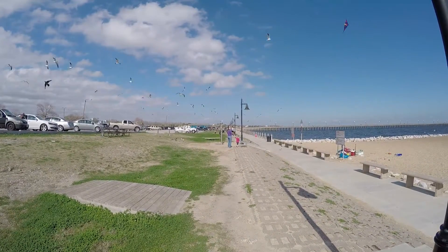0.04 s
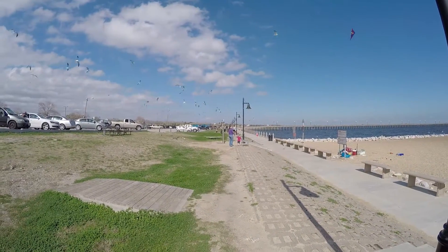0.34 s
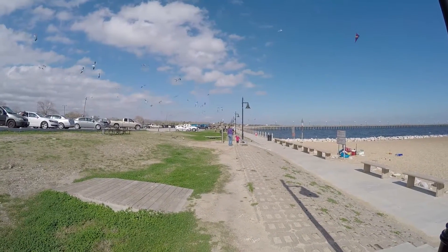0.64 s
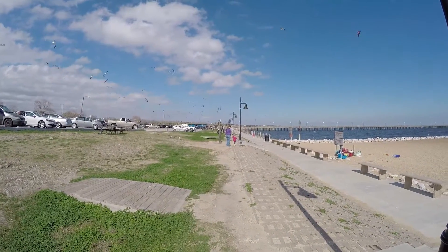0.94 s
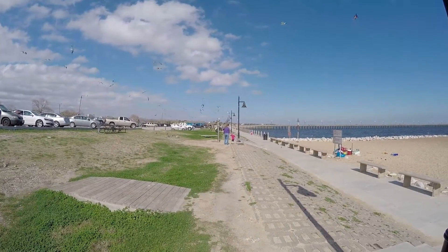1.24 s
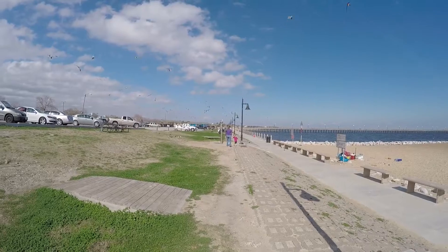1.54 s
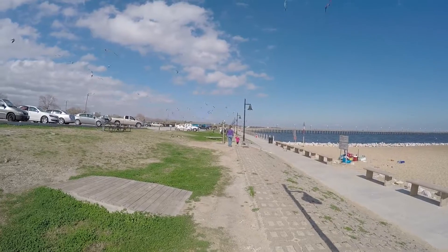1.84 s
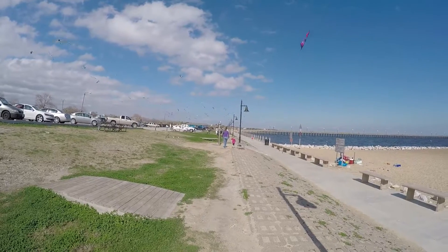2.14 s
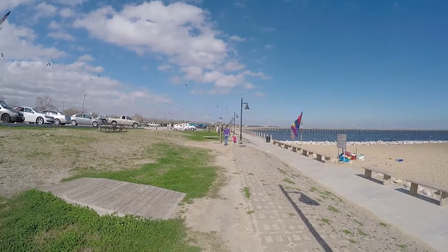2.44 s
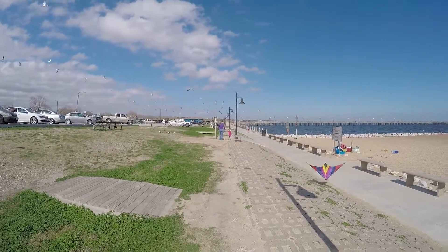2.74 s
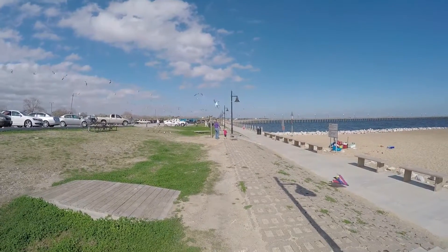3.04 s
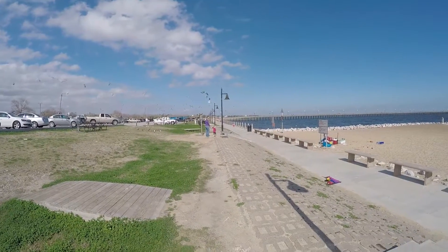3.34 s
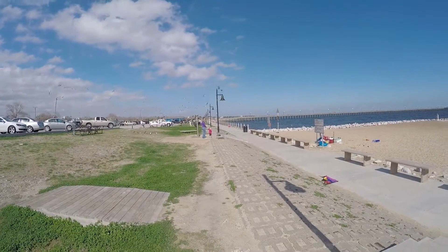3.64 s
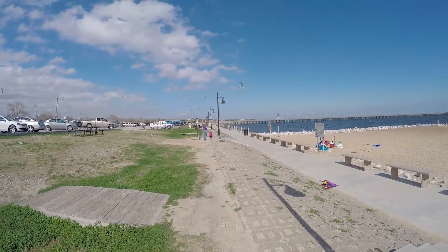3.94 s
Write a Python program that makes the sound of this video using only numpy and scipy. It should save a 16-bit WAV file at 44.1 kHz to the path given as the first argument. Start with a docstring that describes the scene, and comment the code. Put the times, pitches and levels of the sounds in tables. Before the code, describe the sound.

Gusty wind rumbles on the microphone while a kite buzzes down and crashes lightly.

```python
"""A stunt kite dives in a sea breeze. Throughout, turbulent wind rumbles and thumps on the microphone
over a faint hiss of shore and grass. Near 1.7 s the flying gear ticks and the trailing edge begins to
flutter, its buzz growing louder and faster until just before the frame strikes the pavement at 2.6 s.
A thin bird whistle and a far gull follow, and near 3.2 s the kite topples with a few last knocks."""
import sys
import numpy as np
from scipy import signal
from scipy.fft import rfft, irfft, next_fast_len
from scipy.io import wavfile
from scipy.ndimage import map_coordinates

SR = 44100
rng = np.random.default_rng(int(sys.argv[2]) if len(sys.argv) > 2 else 0)


def unload_wav(signal):
    """Save mono or channel-first audio to the path in sys.argv[1] as 16-bit WAV at rate SR, clipped to [-1, 1]."""
    wavfile.write(
        sys.argv[1],
        SR,
        np.round(np.clip(np.atleast_2d(signal).T, -1, 1) * 32767).astype(np.int16),
    )


N = 176400
PULSE_SAMPLES = 4096


def amp(db):
    """Decibels to amplitude ratio."""
    return 10 ** (np.asarray(db) / 20)


def unit(x):
    """Normalisation to rms 1."""
    return x / np.sqrt(np.mean(x ** 2) + 1e-20)


def along(spectrum, hz):
    """Interpolation of a spectrum on a logarithmic frequency axis."""
    freqs, levels = np.transpose(spectrum)
    return np.interp(np.log(hz + 1), np.log(freqs + 1), levels)


def clock():
    """Time of each sample in seconds."""
    return np.arange(N) / SR


def curves(rows, outside=None):
    """Linear interpolation in time of each column after the first."""
    times, *columns = np.transpose(rows)
    return [np.interp(clock(), times, column, outside, outside) for column in columns]


def wobble(rate):
    """Smooth random modulation: a spline through `rate` Gaussian knots a second."""
    knots = rng.standard_normal(int(N * rate / SR) + 4)
    return map_coordinates(knots, [np.arange(N) * rate / SR])


def noise(spectrum):
    """Spectral shaping of white noise, at rms 1."""
    gain = amp(along(spectrum, np.fft.rfftfreq(N, 1 / SR)))
    return unit(irfft(rfft(rng.standard_normal(N)) * gain, N))


def pulse(spectrum):
    """A minimum-phase pulse of the given spectrum, with the energy of 5 ms at rms 1."""
    hz = np.fft.rfftfreq(PULSE_SAMPLES, 1 / SR)
    cepstrum = irfft(np.log(amp(along(spectrum, hz))))
    cepstrum[1:PULSE_SAMPLES // 2] *= 2  # folding the cepstrum makes the pulse causal
    cepstrum[PULSE_SAMPLES // 2 + 1:] = 0
    shape = irfft(np.exp(rfft(cepstrum)))
    return shape / np.linalg.norm(shape) * np.sqrt(0.005 * SR)


def strike(times, gains, shape):
    """Convolution with an impulse train: one copy of the shape at each time."""
    samples = np.clip(np.round(np.asarray(times) * SR).astype(int), 0, N)
    return signal.fftconvolve(np.bincount(samples, gains, N + 1), shape)[:N]


def burst(peak_s, rise_s, decay_s):
    """An envelope of exponential growth and decay."""
    t = clock() - peak_s
    return np.exp(-np.maximum(-t / rise_s, t / decay_s))


def shore():
    """Incoherent sources, far water and grass, add up to an even hiss."""
    # slow drift of the hiss: (time [s], relative level [dB])
    drift = [(0, -89.5), (.3, -93.5), (.8, -88.5), (1.6, -88), (3.1, -87.5), (4, -88)]
    # hiss spectrum: (frequency [Hz], relative density [dB])
    spectrum = [(200, 7.5), (600, 4), (1000, 5), (1800, 1.5), (3000, -3), (4300, -6), (6000, -12),
                (9000, -21.5), (15000, -39)]
    drift_db, = curves(drift)
    return noise(spectrum) * amp(drift_db + 6 + 0.42 * wobble(7.3))


def whistle(call, waver):
    """Frequency modulation: a gliding, wavering tone with a weak second harmonic."""
    hz, level_db = curves(call, outside=-140)
    phase = 2 * np.pi * np.cumsum(hz * (1 + waver * wobble(170))) / SR
    return np.sqrt(2) * amp(level_db) * (np.sin(phase) + amp(-25.5) * np.sin(2 * phase))


def gull():
    """Strong random frequency modulation roughens the rising cry of a far gull."""
    # the cry: (time [s], pitch [Hz], level [dB])
    call = [(2.94, 1664, -100), (2.975, 1725, -83.5), (3.02, 1820, -97)]
    return whistle(call, waver=0.027)


def bird():
    """A nearly pure tone that rises and falls is heard as a thin whistle."""
    # the note: (time [s], pitch [Hz], level [dB])
    call = [(2.778, 4030, -100), (2.799, 4300, -81), (2.849, 4384, -80), (2.925, 4243, -93),
            (2.985, 4115, -93.5), (3.02, 4070, -108)]
    return whistle(call, waver=0.0027)


def wind():
    """Turbulent pressure on the microphone: a rumble, and lumpy eddies that grow in each swirl."""
    # spectra of the rumble and the eddies: (frequency [Hz], relative density [dB])
    rumble_spectrum = [(12, -14), (25, -4), (40, 1), (55, -3.5), (75, -3.5), (110, -7.5), (160, -15),
                       (250, -25), (400, -48), (800, -80)]
    eddy_spectrum = [(50, -8), (130, 1), (230, 1), (350, -2.5), (500, -12.5), (800, -22.5), (1200, -32),
                     (2000, -48), (4000, -73.5)]
    # lasting swirls: (time [s], Gaussian width [s], eddy gain [dB])
    swirls = [(0.117, 0.045, 7.5), (1.295, 0.029, 9.5), (0.951, 0.033, 4), (1.659, 0.032, 10),
              (1.747, 0.065, 8.5), (3.982, 0.03, 14)]
    rumble_db, eddy_db = -48, -63
    swirl_db = sum(db * np.exp(-.5 * ((clock() - at) / width) ** 2) for at, width, db in swirls)
    rumble, eddies = noise(rumble_spectrum), noise(eddy_spectrum)
    lumps = np.clip(wobble(rate=60), -2, 1.4)  # one modulation drives both layers
    rumble = unit(rumble * amp(2.5 * lumps))
    eddies = unit(eddies * amp(6 * lumps))
    return amp(rumble_db) * rumble + amp(eddy_db + swirl_db) * eddies


def thumps():
    """A vortex crosses the microphone: pressure swings faster and harder as its core nears, then slows."""
    # passing vortices: (time [s], relative level [dB], pitch at the core [Hz])
    vortices = [(0.0096, -41.5, 863), (0.032, -41, 420), (0.0905, -33, 763.2), (0.1029, -39, 524),
                (0.1283, -44.5, 524), (0.1382, -44.5, 453), (0.1507, -32.5, 615), (0.1934, -42, 432),
                (0.2779, -45.5, 352), (0.4613, -48, 366), (0.742, -42.5, 380), (0.813, -38, 320),
                (0.8945, -41.0, 320), (0.953, -37, 327), (1.0916, -37.5, 520), (1.303, -46, 600),
                (1.4032, -42.5, 383), (1.5249, -48.5, 427), (1.564, -46.5, 393), (1.606, -34.5, 430),
                (1.636, -40.5, 554), (1.6922, -36.5, 622), (1.7207, -41, 450), (1.7886, -29.5, 748.5),
                (1.8176, -35.5, 566), (1.8331, -29.5, 775), (1.8714, -41.5, 520), (1.932, -46, 400),
                (2.0907, -43.5, 490), (2.2103, -41.5, 539.6), (2.3282, -36.5, 290), (2.3331, -31.5, 294),
                (2.4537, -43, 520), (2.6111, -40.5, 398), (2.698, -46, 570), (2.7238, -42, 654),
                (2.7392, -38, 328), (2.839, -62, 570), (2.9106, -43, 397), (3.4339, -33, 517),
                (3.4663, -34.5, 549), (3.473, -35.5, 450), (3.487, -36, 501), (3.5844, -48.5, 432.6),
                (3.7168, -53, 496.4), (3.9565, -38.0, 269.3), (3.9761, -39.5, 480)]
    twist, falloff, passage_s = 1.3, 0.31, 0.012
    core_db, froth_db = -0.95, -8.5
    pressure = np.zeros(N)
    for at, db, hz in vortices:
        t = clock() - at
        offset = 2 * np.pi * hz * t / twist  # distance from the core, in core radii
        swing = np.cos(twist * np.arcsinh(offset) + np.pi / 4)
        reach = (1 + offset ** 2) ** -falloff * np.exp(-(t / passage_s) ** 2)
        froth = wobble(rate=1.6 * hz)  # ragged fluctuation riding on the swing
        polarity = rng.choice([-1, 1])
        pressure += amp(db) * reach * (polarity * amp(core_db) * swing + amp(froth_db) * froth)
    return pressure


def ticks():
    """Damped transients: the flying gear ticks in short bursts of band noise as the dive begins."""
    # light ticks: (time [s], level [dB], centre frequency [Hz], decay time [s])
    events = [(1.662, -62, 1190, 0.0063), (1.664, -76.5, 3560, 0.024), (1.6885, -66.5, 4800, 0.0029)]
    rise_s = 0.00069
    octaves = np.linspace(-3, 3, 13)
    skirt_db = -10 * octaves ** 2
    sound = np.zeros(N)
    for at, db, hz, decay_s in events:
        band = np.column_stack([hz * 2 ** octaves, skirt_db])
        sound += amp(db) * burst(at, rise_s, decay_s) * noise(band)
    return sound


def crash():
    """Impact and friction: each contact is a click of the frame inside a scuff of cloth on concrete."""
    # contacts: (time [s], click level [dB], scuff level [dB], scuff decay time [s])
    hits = [(2.631, -76, -52, 0.007), (2.6421, -59.5, -51.5, 0.0043), (2.654, -65, -62.5, 0.038),
            (3.155, -86, -73, 0.02), (3.179, -70, -67.5, 0.017), (3.26, -81, -81, .008)]
    # spectra of scuff and click: (frequency [Hz], relative density [dB])
    scuff_spectrum = [(150, 0), (350, 16), (850, 15.5), (1900, 2), (3500, 3.5), (6000, -4.5), (8500, -9),
                      (11000, -20.5), (13000, -8), (15500, -30)]
    click_spectrum = [(300, 5), (1500, -6), (4000, 0), (6500, -14), (9000, -6), (11000, -15), (13000, -14),
                      (15500, -18)]
    rise_s, grit_db = 0.0036, 3
    times, click_db, _, _ = np.transpose(hits)
    scuff_envelope = sum(amp(db) * burst(at, rise_s, decay_s) for at, _, db, decay_s in hits)
    grit = unit(noise(scuff_spectrum) * amp(grit_db * wobble(900)))
    return strike(times, amp(click_db), pulse(click_spectrum)) + scuff_envelope * grit


def ground_echo(direct):
    """Comb filtering: the direct sound plus a pavement reflection that closes in as the kite drops."""
    # lag of the reflection: (time [s], delay [s])
    delays = [(2.41, .0038), (2.63, 0.000774)]
    lag_s, = curves(delays)
    return direct + amp(-7.5) * map_coordinates(direct, [(clock() - lag_s) * SR])


def flutter():
    """Aeroelastic flutter: the trailing edge snaps out and back, rustling over the rush of air."""
    # the dive: (time [s], flap rate [Hz], relative level [dB])
    dive = [(1.7, 49, -100), (1.95, 52, -83.5), (2.06, 54, -85.5), (2.12, 55.3, -79), (2.3, 55.5, -73.5),
            (2.4, 57.5, -71.5), (2.46, 62, -70.5), (2.54, 61, -66), (2.6, 59, -67), (2.714, 50, -71.5),
            (2.726, 45, -79)]
    # spectra of sail noise and of one snap: (frequency [Hz], relative density [dB])
    sail_spectrum = [(150, -5), (500, 2.5), (1000, 1.5), (1800, -2.5), (3000, -3), (4200, -4.5),
                     (6000, -10.5), (8000, -17), (10500, -23), (15000, -35)]
    snap_spectrum = [(150, -4.5), (500, 5.5), (1000, -3), (1800, 3), (3000, 3.5), (4200, 0), (6000, -13),
                     (9000, -25.5), (15000, -40)]
    # hardest cracks of the cloth: (time [s], level [dB])
    cracks = [(2.3309, -66.5), (2.3487, -66.5), (2.407, -69), (2.4191, -62.5), (2.4355, -69), (2.452, -66),
              (2.4841, -62), (2.532, -65), (2.549, -60.5), (2.566, -70)]
    snap_db, rustle_db, rush_db = -10, -3.5, -6
    back_flap_db, scatter_db, jitter_s, rustle_decay_s = -7.5, 1.5, 0.0002, 0.0031
    flap_hz, _ = curves(dive)
    _, level_db = curves(dive, outside=-140)
    rustle, rush = noise(sail_spectrum), noise(sail_spectrum)
    jitter, scatter = rng.standard_normal((600, 2)).T

    cycles = np.cumsum(flap_hz) / SR
    cycles -= np.interp(2.3305, clock(), cycles)  # an outward snap falls at this time
    half_cycle = np.floor(2 * cycles)
    reversals = np.flatnonzero(np.diff(half_cycle)) + 1
    times = reversals / SR + jitter_s * jitter[:len(reversals)]
    gains = amp(back_flap_db * (half_cycle[reversals] % 2) + scatter_db * scatter[:len(reversals)])

    snap = pulse(snap_spectrum)
    snaps = unit(strike(times, gains, snap))
    rustle_tail = np.exp(-np.arange(PULSE_SAMPLES) / SR / rustle_decay_s)
    rustle = unit(rustle * strike(times, gains, rustle_tail))
    buzz = amp(snap_db) * snaps + amp(rustle_db) * rustle + amp(rush_db) * rush
    crack_times, crack_db = np.transpose(cracks)
    return amp(level_db) * buzz + strike(crack_times, amp(crack_db), snap)


def scene():
    """Superposition: all sources add in open air at one microphone."""
    kite = ground_echo(flutter()) + crash() + ticks()
    birds = bird() + gull()
    return (wind() + thumps() + kite + birds + shore())[None]


def record(dry):
    """Saturation rounds off the hardest thumps at the microphone; a steep low-pass limits the band."""
    ceiling_db, cutoff_hz = -33, 15500
    saturated = dry / (1 + (dry / amp(ceiling_db)) ** 6) ** (1 / 6)
    size = next_fast_len(N + PULSE_SAMPLES)
    low_pass = 1 / (1 + (np.fft.rfftfreq(size, 1 / SR) / cutoff_hz) ** 120)
    return irfft(rfft(saturated, size) * low_pass, size)[..., :N]


dry = scene()
out = record(dry)
unload_wav(out)
```